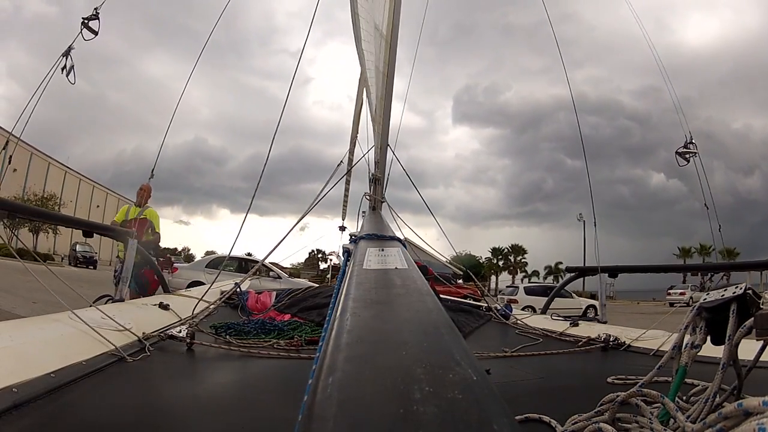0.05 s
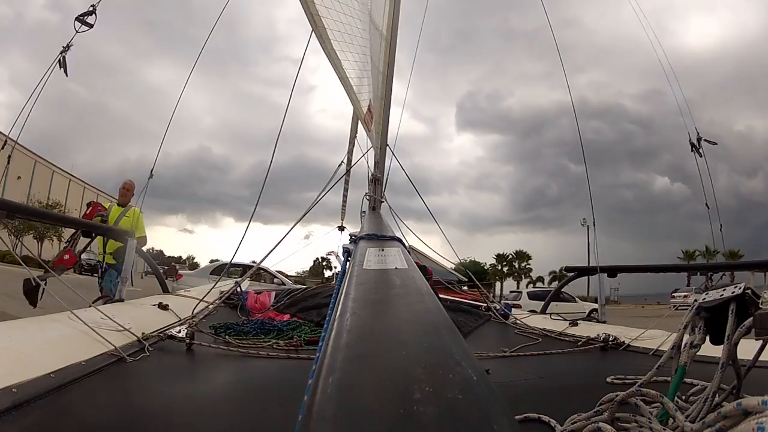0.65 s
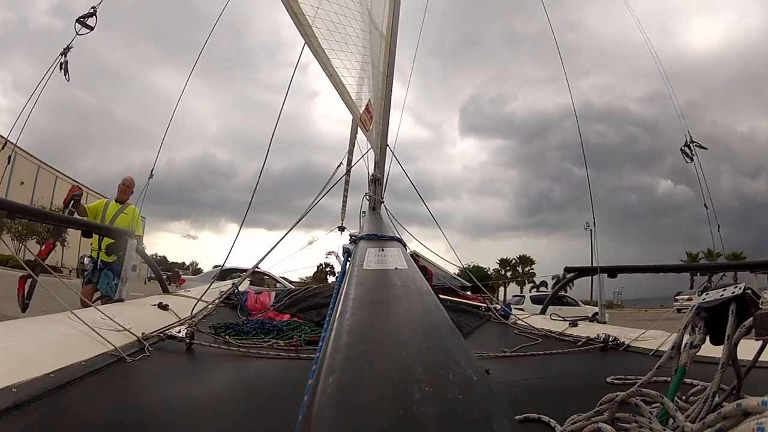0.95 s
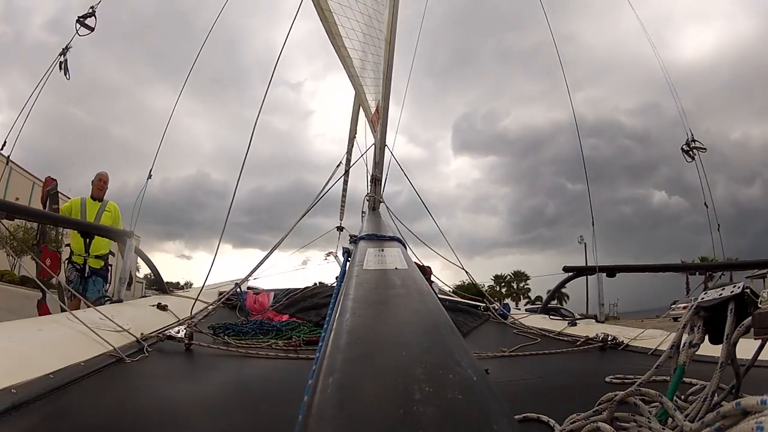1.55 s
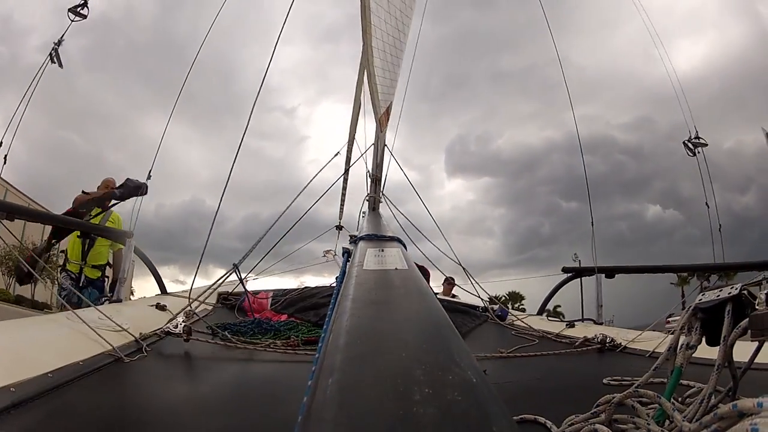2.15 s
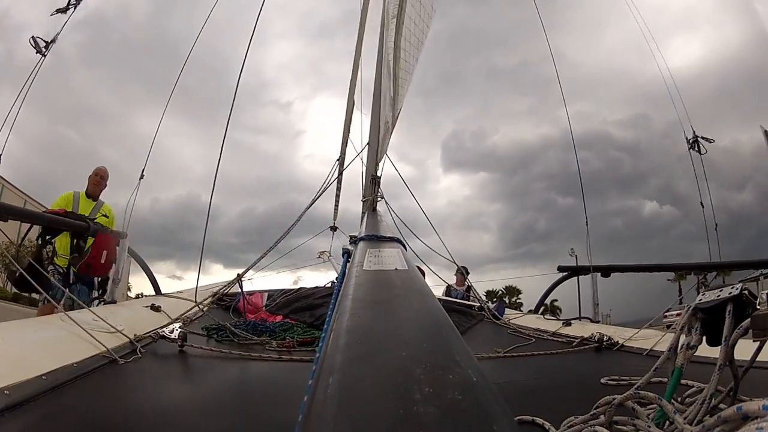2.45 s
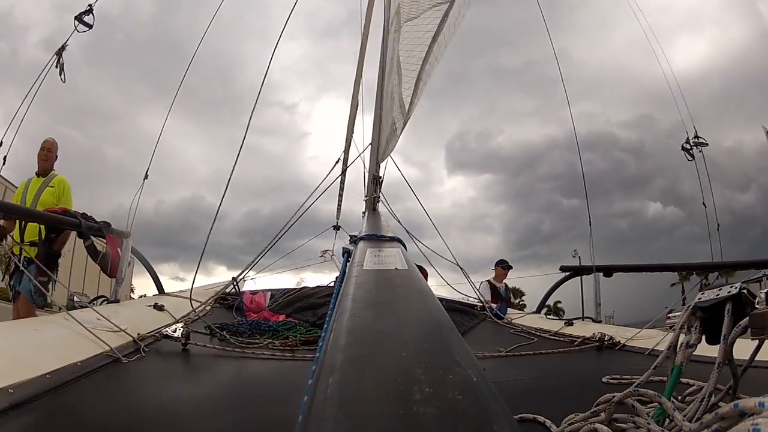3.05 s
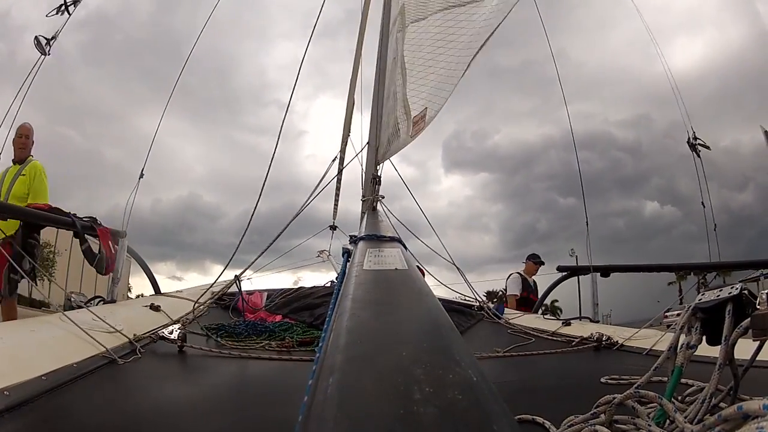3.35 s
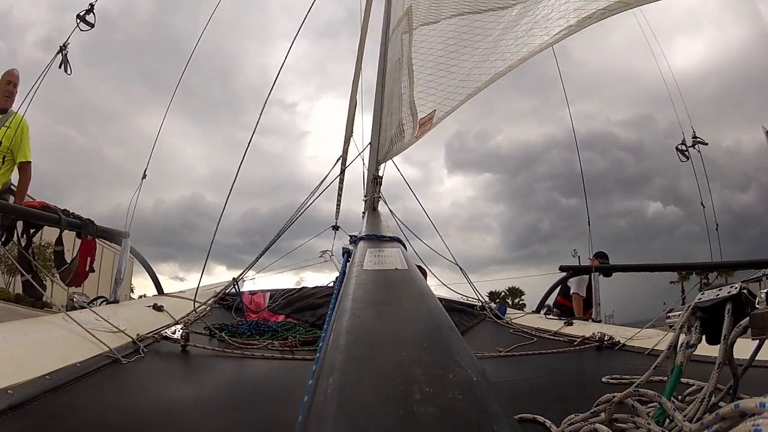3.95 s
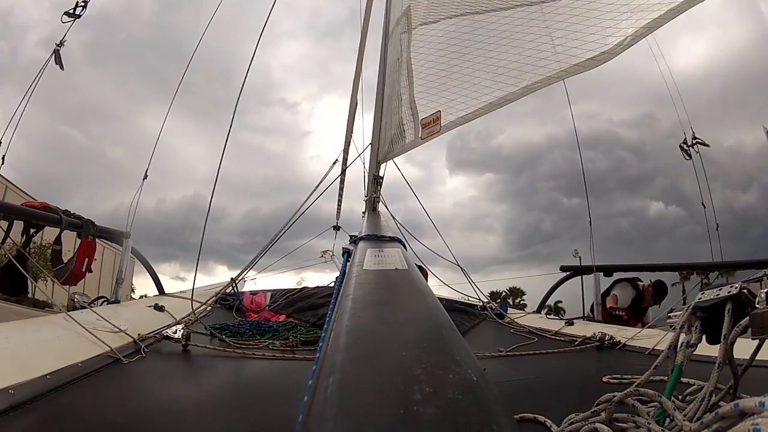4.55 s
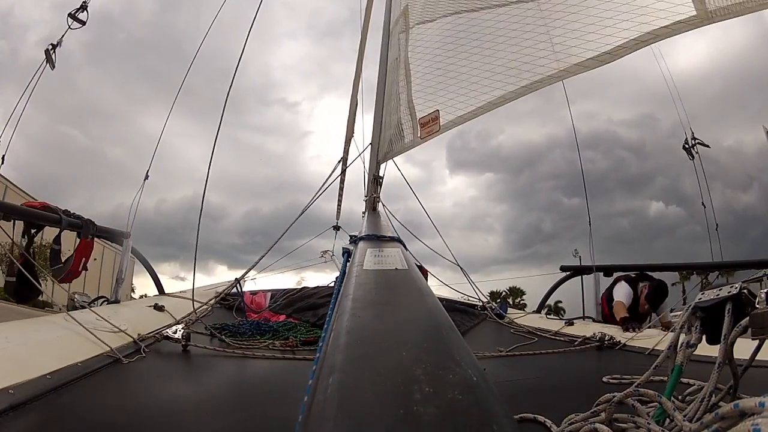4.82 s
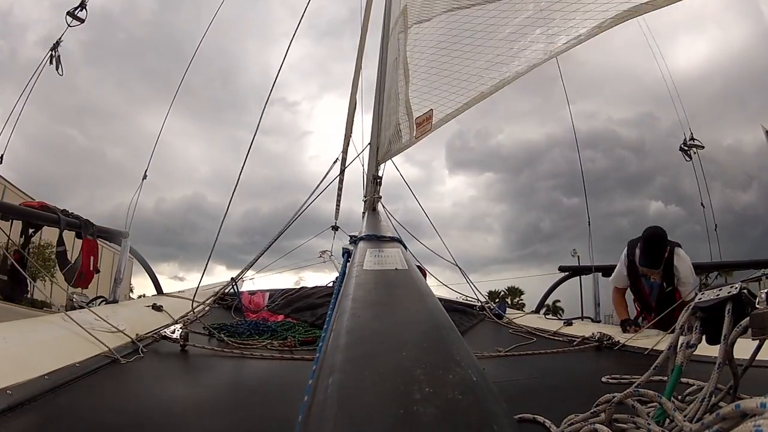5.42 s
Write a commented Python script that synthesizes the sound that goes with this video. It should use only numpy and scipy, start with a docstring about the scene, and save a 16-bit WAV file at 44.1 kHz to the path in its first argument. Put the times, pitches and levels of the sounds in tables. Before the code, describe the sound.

A quiet stretch of air and small knocks gives way to sailcloth cracking and thudding as it catches a gust, making the boat's mast and wires boom. A rope rubs and judders over the deck gear, turning a pulley that gives faint, high squeaks. Woody knocks continue, the loudest near the end with more low thumps. The microphone sits in a closed housing on the deck, sounding boxy with a glassy treble.

```python
"""A headsail unrolls on a sailing boat in gusty wind: the cloth slaps and tugs the rig, which booms.
A line rubs over the deck gear, rasps out in bursts and turns a squeaking sheave (a pulley wheel).
Blocks (pulleys) knock, and gusts rock the hull. The slaps, knocks and rubbing ring through the deck
into a closed camera housing fixed on it. The recorder holds each sample at a low rate,
which adds a glassy treble."""
import sys
import numpy as np
from scipy import signal
from scipy.fft import rfft, irfft
from scipy.io import wavfile
from scipy.ndimage import uniform_filter1d

SR = 44100
rng = np.random.default_rng(int(sys.argv[2]) if len(sys.argv) > 2 else 0)


def transcribe(signal):
    """Save signal, clipped to [-1, 1], as a 16-bit WAV file at the path in sys.argv[1]."""
    frames = np.atleast_2d(signal).T
    limited = np.clip(frames, -1, 1)
    pcm = np.round(limited * 32767).astype(np.int16)
    wavfile.write(sys.argv[1], SR, pcm)


N = 250664
T = np.arange(N) / SR


def from_db(db):
    """Turn decibels into a number to multiply by."""
    return 10 ** (np.asarray(db) / 20)


def unit_power(x):
    """Scale a signal so that its average power is one."""
    return x / np.sqrt(np.mean(x ** 2) + 1e-20)


def evened(x, seconds):
    """Even out the loudness: keep the power near one over each stretch of this length."""
    return x / np.sqrt(np.abs(uniform_filter1d(x ** 2, int(seconds * SR))) + 1e-12)


def at_level(hit, db):
    """Scale a hit so that its loudest hundredth of a second has this level."""
    return hit * from_db(db) / np.sqrt(uniform_filter1d(hit ** 2, SR // 100).max())


def below_peak(curve):
    """Join (time, level) points with straight lines and shift the top to 0 dB."""
    db = np.interp(T, *np.transpose(curve))
    return db - db.max()


def add(track, start_s, sound):
    """Mix a sound into a track at the given time."""
    at = int(start_s * SR)
    track[at:at + len(sound)] += sound[:N - at]


def lowpass(x, hz, order=2):
    """Dull a sound by turning down what lies above hz."""
    return signal.sosfilt(signal.butter(order, min(hz, .45 * SR), fs=SR, output="sos"), x)


def drift(rate_hz):
    """A smooth random wobble, typically of size one, that changes at about this rate."""
    hz = np.fft.rfftfreq(N, 1 / SR)
    return unit_power(irfft(rfft(rng.standard_normal(N)) / (1 + (hz / rate_hz) ** 2) ** 2, N))


def resonate(x, modes):
    """Ring an object's modes, its natural notes (pitch, width, gain), adding them with alternate signs."""
    out = 0
    for k, (hz, width, db) in enumerate(modes):
        r = np.exp(-np.pi * width / SR)
        poles = [1, -2 * r * np.cos(2 * np.pi * hz / SR), r * r]
        ringing = signal.lfilter([1, 0, -1], poles, x + 1e-18)
        out = out + (-1) ** k * from_db(db) * (1 - r * r) / 2 * ringing
    return out


# how hard the wind pushes on the boat, used relative to its peak: t/s, level/dB
WIND_LOAD = [(0.0, -69), (0.43, -47), (1.83, -57.5), (1.99, -31.5), (2.09, -21), (2.4, -33.5), (2.44, -39),
             (2.5, -30), (2.69, -37), (2.74, -41), (3.34, -38.5), (3.49, -45.5), (3.54, -42.5),
             (4.76, -51.5), (4.84, -45.5), (5.09, -43), (5.14, -38.5), (5.68, -43.5)]
# low notes of the hull: f/Hz, width/Hz, gain/dB
HULL_MODES = [(22.8, 4.1, 8.5), (51.5, 13, -12)]
# low notes of the rig (the mast and its wires): f/Hz, width/Hz, gain/dB
RIG_MODES = [(77.8, 23.6, 0.5), (121.5, 11.7, 5.5), (152.4, 48, -11.5), (222.6, 12.8, -6.5),
             (279, 16.7, -13.5), (420, 17, -22)]
# tone of the steady air and hiss: f/Hz, relative level/dB
AIR_SPECTRUM = [(25, -5.5), (55, -12), (250, -17), (500, -25), (900, -34), (1300, -35.5), (2500, -36.5),
                (5500, -41.5)]


def wind():
    """Gusts rock the hull and, with the sail's tugs, keep the rig rumbling, over steady air."""
    load_db = below_peak(WIND_LOAD)
    eddies_db = 3.5 * drift(3.2)  # swirls of air make the sway uneven
    hull = lowpass(resonate(rng.standard_normal(N), HULL_MODES), hz=92)
    sway = from_db(-20.5 + 1.237 * load_db + eddies_db) * evened(hull, seconds=0.1)

    tugging, _ = tug_swings()
    shaking = np.hypot(from_db(-22.5 + 1.15 * load_db), from_db(-10.5) * tugging)
    rig = lowpass(resonate(rng.standard_normal(N), RIG_MODES), hz=474, order=4)
    rumble = shaking * evened(rig, seconds=0.1)

    hz, db = np.transpose(AIR_SPECTRUM)
    tone = from_db(np.interp(np.log(np.fft.rfftfreq(N, 1 / SR) + 1), np.log(hz), db))
    air = from_db(-56) * unit_power(irfft(rfft(rng.standard_normal(N)) * tone, N))
    return sway + rumble + air


# pitches that the deck hardly lets through: f/Hz, width/Hz
DECK_DEAD_SPOTS = [(340, 190), (445, 16), (1240, 19), (1530, 216), (2820, 400)]


def dead_spots(x):
    """Between its ringing notes the deck swallows some pitches."""
    for hz, width in DECK_DEAD_SPOTS:
        x = signal.lfilter(*signal.iirnotch(hz, hz / width, fs=SR), x)
    return x


# ringing notes of the deck and camera housing: f/Hz, width/Hz, gain/dB
DECK_MODES = [(259, 117, -12), (412.5, 26, -17.5), (538, 14.5, -4.5), (675.6, 53.3, 0), (806, 20, -1.5),
              (899, 62.5, -4.5), (1164, 92, -16.5), (1340, 26, -12.5), (1454, 24, -9.5), (1630, 143, -16.5),
              (1873, 43, -13), (2017, 108, -20), (2205, 33, -15.5), (2536, 100, -30.5), (3050, 83, -21.5),
              (3565, 165, -18.5)]


def deck(x):
    """A vibration makes the deck ring on its way to the microphone."""
    return dead_spots(resonate(x, DECK_MODES))


def tiny_clicks(per_s, spread_db):
    """Many random clicks of uneven size, as when rope fibres catch and let go."""
    clicks = rng.random(N) < per_s / SR
    return unit_power(clicks * rng.standard_normal(N) * from_db(spread_db * drift(78)))


# how strongly the line runs, used relative to its peak: t/s, level/dB
LINE_RUN = [(0.0, -77), (0.43, -72), (0.93, -69), (1.09, -63.5), (1.44, -70.5), (1.98, -64.5), (2.01, -50),
            (2.12, -40), (2.15, -29.5), (2.34, -36.5), (2.42, -32.5), (2.56, -40.5), (3.01, -44.5),
            (3.18, -42), (3.51, -53), (3.83, -46), (4.29, -63.5), (4.78, -64), (4.92, -61), (5.05, -55.5),
            (5.22, -53.5), (5.47, -57), (5.68, -52.5)]


def running_line():
    """Braided rope rubs over the deck gear, throbbing as its strands pass; slow rubbing is duller."""
    run_db = -32 + 0.95 * below_peak(LINE_RUN)
    friction = tiny_clicks(per_s=4000, spread_db=1.0)
    slow = evened(deck(resonate(friction, [(870, 630, 0)])), seconds=0.087)
    fast = evened(deck(lowpass(friction, hz=1340, order=1)), seconds=0.041)
    speed = np.clip((run_db + 62.5) / 12, .1, 1)
    throb_db = 1.6 * drift(30)
    return from_db(run_db + throb_db) * (np.sqrt(speed) * fast + np.sqrt(1 - speed) * slow)


def blow(fade_s, snap):
    """The force of a hit: one sharp push, sized by snap, then chatter that dies away."""
    decay = np.exp(-T[:SR // 5] / fade_s)
    force = rng.standard_normal(len(decay)) * decay
    force[0] += snap * np.linalg.norm(force)
    flat = irfft(np.exp(1j * np.angle(rfft(force))), len(decay))  # all pitches equally strong
    return flat * np.sqrt(decay)


def loose_taps(per_s=7.4, fade_s=0.011, hz=848, hollow_db=-19.5):
    """Loose gear taps unevenly, louder while the line runs; gives extra rows for the knocks below."""
    run_db, rows = below_peak(LINE_RUN), []
    for k, (timing, strength, pitch) in enumerate(rng.uniform(-1.1, 1, size=(64, 3))):
        start_s = (k + 1 + timing / 2) / per_s
        if start_s < T[-1]:
            db = -40 + 0.57 * run_db[int(start_s * SR)] + 3.5 * strength
            rows.append((start_s, db, fade_s, hz * (1 + .12 * pitch), hollow_db))
    return rows


# notes of the hollow spar (a pole) that the blocks hit: f/Hz, width/Hz, gain/dB
SPAR_MODES = [(262, 56, -13), (570, 30.4, 2), (1640, 48, -23), (1740, 58, -14)]
# blocks and shackles knocking: t/s, level/dB, fade/s, f/Hz, hollow ring/dB
BLOCK_KNOCKS = [(.327, -40.5, 0.0071, 880, -9), (.386, -53.5, 0.019, 755, -4),
                (.583, -42, 0.0048, 886, -11), (.622, -50.5, 0.0033, 640, -7), (.673, -56, 0.0049, 780, -6),
                (.966, -53, 0.0092, 635, -1), (1.062, -45.5, 0.011, 894, -10.5),
                (1.346, -57, .006, 980, -5), (3.091, -40, 0.0072, 790, -25),
                (3.258, -32.5, 0.03, 850, -10.5), (3.358, -35, 0.039, 670, -2.5),
                (3.615, -46, .005, 740, -22.5), (3.756, -43, 0.0064, 810, -30),
                (3.92, -43.5, 0.046, 706, -2), (4.481, -39.5, 0.021, 814, -25),
                (4.596, -51.5, 0.0024, 930, -20), (4.635, -50, 0.068, 878, -15),
                (4.851, -46.5, 0.061, 686, -2), (4.895, -45, 0.03, 910, -18), (5.006, -48, .008, 850, -13),
                (5.056, -43.5, 0.014, 740, -13), (5.242, -24, 0.0083, 900, -20),
                (5.323, -38, 0.0077, 817, -11.5), (5.462, -49.5, 0.037, 870, -30)]


def blocks():
    """A block's short woody note is heard directly and through the deck; some hits ring the spar too."""
    out = np.zeros(N)
    for start_s, db, fade_s, hz, hollow_db in BLOCK_KNOCKS + loose_taps():
        force = blow(fade_s, snap=0.34)
        note = resonate(force, [(hz, 130, 0)])
        direct = resonate(note, [(906.4, 107, -0.5)])
        hollow = from_db(hollow_db) * resonate(force, SPAR_MODES)
        knock = lowpass(deck(note) + direct + hollow, hz=2100, order=3)
        add(out, start_s, at_level(knock, db))
    return out


# the sail pulling on the rig: t/s, level/dB, hold/s, overtone relative to that level/dB
RIG_TUGS = [(0.619, -43.5, 0.066, -22.5), (1.955, -25, 0.051, -9.5), (2.018, -13, .004, -30),
            (2.199, -17.5, 0.057, -41), (2.356, -24, 0.0044, -36), (2.492, -26.5, .04, -30),
            (2.924, -35, 0.042, -19), (3.171, -40.5, 0.11, -20), (3.874, -43, 0.04, -33),
            (4.848, -32, .004, -6.5), (5.064, -38, .01, -30), (5.126, -24.5, 0.022, -28.5),
            (5.243, -20.5, 0.025, -20)]


def tug_swings(swell_s=0.014, fade_s=0.044, overtone_lag_s=0.011):
    """How far the rig swings at its booming note and its overtone: each tug swells, holds and fades."""
    power, overtone_power = np.zeros(N), np.zeros(N)
    t = T[:SR // 2]
    for start_s, db, hold_s, overtone_db in RIG_TUGS:
        rise = np.sin(np.pi / 2 * np.minimum(t / swell_s, 1))
        fall = np.exp(-np.maximum(t - swell_s - hold_s, 0) / fade_s)
        swing = from_db(db) * rise * fall
        add(power, start_s, swing ** 2)
        add(overtone_power, start_s + overtone_lag_s, (swing * from_db(overtone_db)) ** 2)
    return np.sqrt(power), np.sqrt(overtone_power)


def rig_boom(hz=114.5):
    """Tugs sound a deep note in the tight rig; its pitch wavers with the tension."""
    swing, overtone = tug_swings()
    phase = 2 * np.pi * np.cumsum(hz * (1 + 0.0254 * drift(25.94))) / SR
    return np.sqrt(2) * (swing * np.sin(phase) + overtone * np.sin(2 * phase + 1.3 * drift(45)))


# notes of the stay, the wire that carries the sail: f/Hz, width/Hz, gain/dB
STAY_MODES = [(650, 44, 3.5), (1930, 920, 3.5)]
# the cloth snapping tight: t/s, crack level/dB, thud level/dB, fade/s
SAIL_SLAPS = [(1.947, -46, -36.5, 0.043), (1.961, -28, -24.5, 0.045), (1.986, -25.5, -26.5, 0.012),
              (2.0205, -24.5, -28.5, 0.004), (2.038, -22.5, -45, 0.018), (2.080, -30, -52, 0.014),
              (2.0954, -25.5, -18, 0.0067), (2.1905, -14.5, -19.5, 0.0025), (2.2275, -48, -19.5, 0.013),
              (2.264, -48, -27, 0.0089), (2.351, -25.5, -15, .0055), (2.479, -38, -28, 0.0091)]


def sail(crack_cutoff_hz=4320, thud_cutoff_hz=670, thud_delay_s=.007):
    """Each slap is a bright crack and then a dull thud; both jolt the stay and the deck."""
    out = np.zeros(N)
    for start_s, crack_db, thud_db, fade_s in SAIL_SLAPS:
        crack = (start_s, crack_db, crack_cutoff_hz)
        thud = (start_s + thud_delay_s, thud_db, thud_cutoff_hz)
        for at_s, db, cutoff_hz in (crack, thud):
            force = blow(fade_s, snap=0.38)
            for mode in STAY_MODES:  # the stay adds its own notes to the jolt
                force = force + resonate(force, [mode])
            slap = deck(lowpass(force, cutoff_hz, order=1))
            add(out, at_s, at_level(slap, db))
    return out


# notes of the tight line in its lead, the guide it runs through: f/Hz, width/Hz, gain/dB
LEAD_MODES = [(1366, 43, 10.5), (1647, 33, 9.5), (2064, 496, 2.5), (2307, 51, 12.5), (2760, 33, -14),
              (3190, 370, 1), (3540, 61, 12), (3660, 46, 15.5), (4260, 55, 2.5), (4370, 290, -3)]
# bursts of slipping: t/s, level before the starting boost/dB, length/s
LINE_SLIPS = [(2.016, -40, 0.013), (2.19, -39, 0.0045), (2.283, -52.5, 0.064), (2.34, -41, 0.13),
              (2.496, -43.5, .1), (2.657, -52, .14), (2.809, -43.5, 0.091), (2.897, -42, 0.084),
              (3.152, -59, 0.019), (3.397, -63.5, 0.032)]


def slipping_line(boost_db=9.5, boost_s=0.026, judder_hz=46.68):
    """The line is loudest as it breaks loose, then rasps through its lead with a judder and stops."""
    loudness = np.zeros(N)
    t = T[:SR // 4]
    breakaway_db = boost_db * np.exp(-t / boost_s)
    rise = np.minimum(t / 0.0073, 1)
    for start_s, db, length_s in LINE_SLIPS:
        fall = np.exp(-np.maximum(t - length_s, 0) / 0.016)
        add(loudness, start_s, from_db(db + breakaway_db) * rise * fall)
    # the line sticks and slips at a wandering rate
    cycles = np.cumsum(judder_hz * (1 + 0.251 * drift(29.5))) / SR
    judder = from_db(3 * np.sin(2 * np.pi * cycles))
    rasp = dead_spots(resonate(tiny_clicks(per_s=2500, spread_db=2.0), LEAD_MODES))
    return loudness * judder * evened(rasp, seconds=0.022)


# one squeak for each turn of the wheel: t/s, gain/dB
SHEAVE_SQUEAKS = [(2.98, -53), (3.17, -55), (3.355, -54.5), (3.539, -56.5), (3.708, -60.5), (3.894, -64),
                  (4.066, -65), (4.25, -65), (4.543, -67), (4.745, -72), (5.19, -73)]


def sheave(pitch_hz=3750, length_s=0.081):
    """The dry axle sings once a turn: the pitch leaps up, sags, and drops as it lets go."""
    out = np.zeros(N)
    waver = drift(560)
    scrape = from_db(2.0 * drift(200))
    progress = np.linspace(0, 1, int(length_s * SR))
    glide_hz = pitch_hz * np.interp(progress, [0, .12, .45, .8, 1], [0.97, 1.01, .99, .945, 0.32])
    swell = np.interp(progress, [0, .15, .4, .75, 1], [.1, 0.55, 0.73, 0.54, 0.31])
    scratchiness = 0.061 * (1.02 - swell)  # the note is steadiest where it is loudest
    for start_s, db in SHEAVE_SQUEAKS:
        at = int(start_s * SR)
        hz = glide_hz * (1 + scratchiness * waver[at:at + len(progress)])
        add(out, start_s, from_db(db) * swell * np.sin(2 * np.pi * np.cumsum(hz) / SR))
    return out * scrape


def scene():
    """All the sounds meet in one microphone."""
    return (sail() + blocks() + rig_boom() + running_line() + slipping_line() + sheave() + wind())[None]


def record(dry, low_rate_hz=12000, repeats=4):
    """Holding low-rate samples mirrors the sound into a glassy treble; long loud swings crackle faintly."""
    narrow = lowpass(dry, hz=5600, order=10)
    low_rate = signal.resample_poly(narrow, low_rate_hz, SR, axis=1)
    held = np.repeat(low_rate, repeats, axis=1)
    glassy = signal.resample_poly(held, SR, repeats * low_rate_hz, axis=1)[:, :N]
    # loudness over about the last eighth of a second
    loudness = np.sqrt(np.abs(signal.lfilter([8 / SR], [1, 8 / SR - 1], glassy ** 2)))
    overload = np.maximum(loudness - from_db(-22), 0)
    crackle = from_db(-23) * overload * lowpass(tiny_clicks(per_s=1400, spread_db=8.5), hz=6840)
    treble_cut = signal.ellip(10, .2, 80, 15300, fs=SR, output="sos")
    return signal.sosfilt(treble_cut, glassy + crackle)


dry = scene()
out = record(dry)
transcribe(out)
```